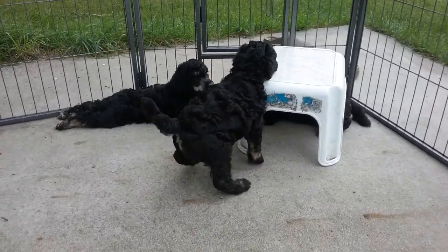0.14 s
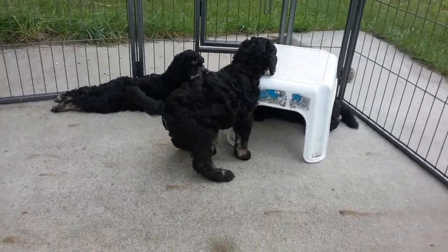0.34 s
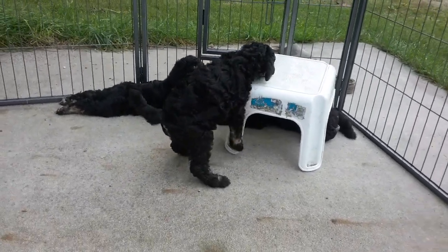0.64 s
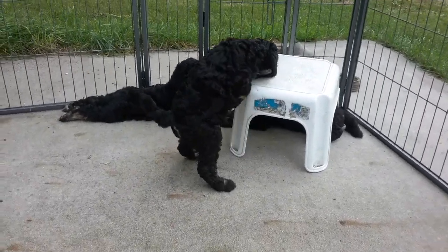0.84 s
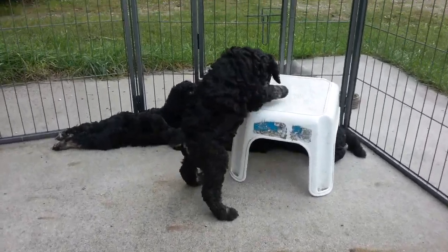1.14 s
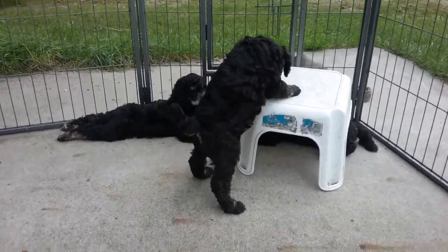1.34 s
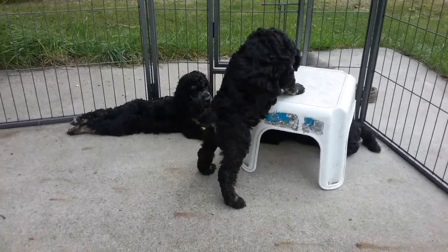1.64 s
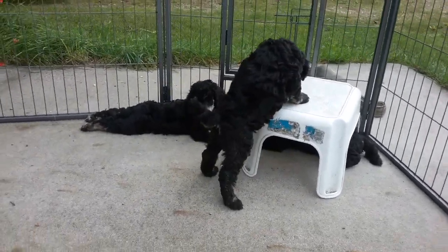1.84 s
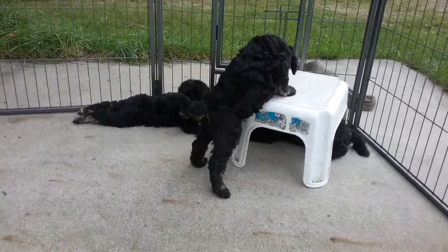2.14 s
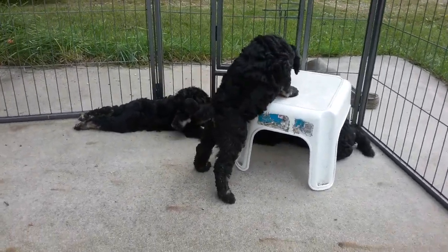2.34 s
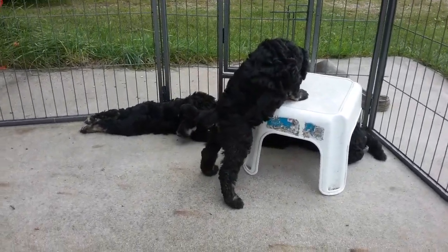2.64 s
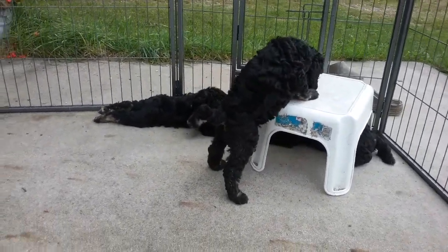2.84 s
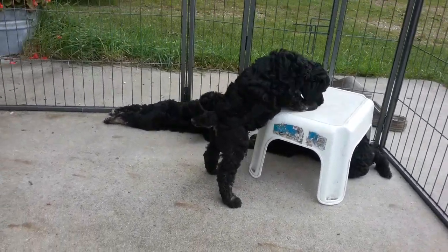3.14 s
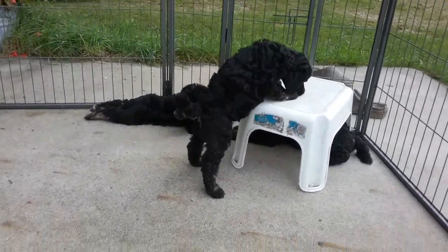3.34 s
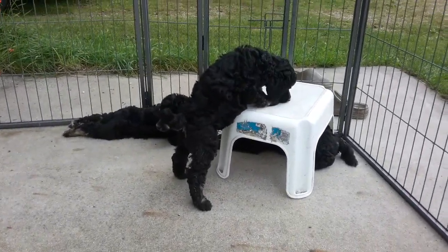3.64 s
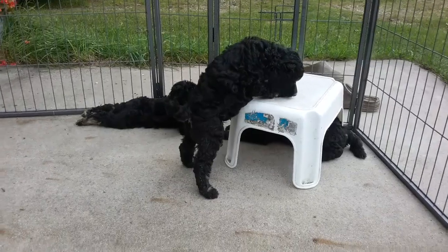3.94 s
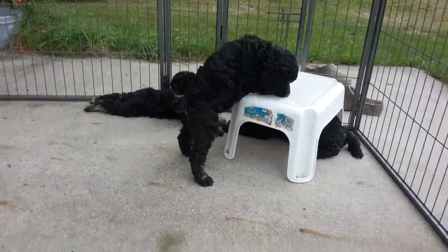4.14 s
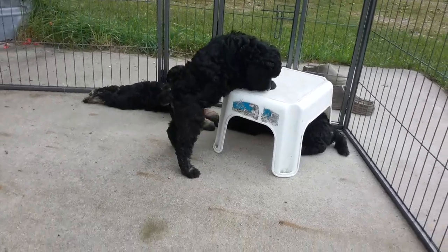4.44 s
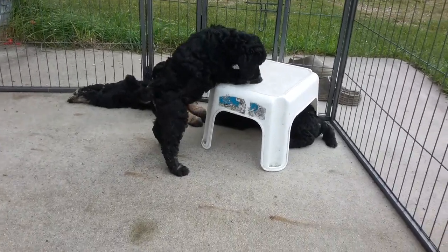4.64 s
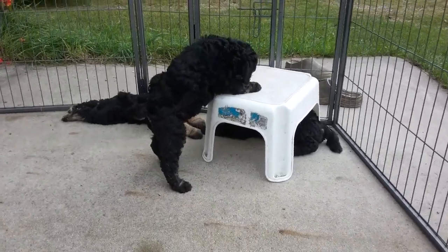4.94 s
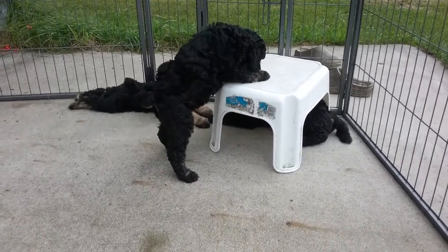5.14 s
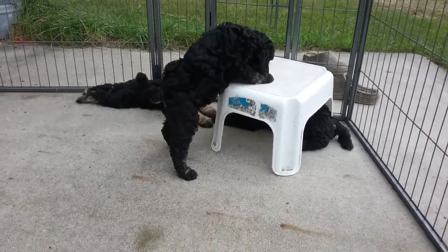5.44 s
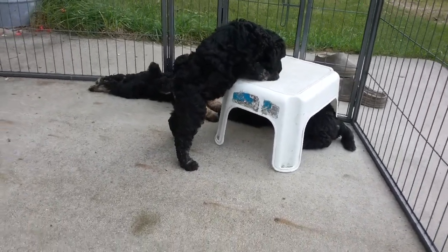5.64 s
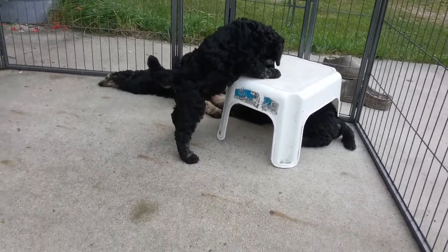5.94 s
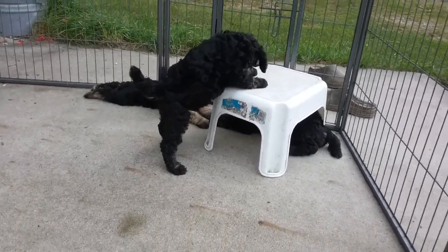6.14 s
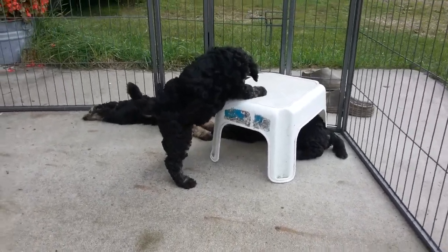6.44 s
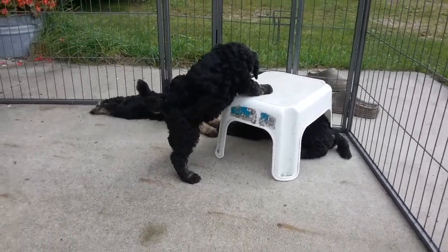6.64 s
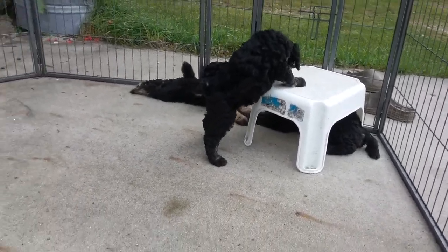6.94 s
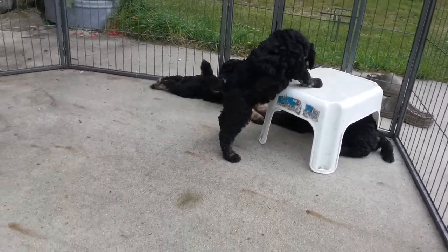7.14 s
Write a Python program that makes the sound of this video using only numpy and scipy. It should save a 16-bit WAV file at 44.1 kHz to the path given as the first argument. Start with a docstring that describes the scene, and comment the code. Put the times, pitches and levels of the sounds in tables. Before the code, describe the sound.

Close outdoor sound of soft paw pads knocking a light, hollow plastic step stool, making dull drumlike thuds with slight leg rocking and brief rim clacks. Dry claw scratches and fur rubbing fill the gaps. One bright bird call sounds early; faint high peeps recur far away. Activity comes in uneven bursts, strongest early, around three seconds and mid-five, over very quiet air with a short faint echo.

```python
"""A puppy paws at a hollow plastic step stool on a patio: pads thump the seat, a bank of decaying modes.
Claws tick and scratch as runs of tiny slips that shake the shell; pads and fur rub as filtered friction noise.
A house wall returns a short echo of blows and claws, made by convolution with decaying noise.
A bird calls once, a gliding sine; faint peeps and two faint high notes are narrow bands of noise.
Filtered noise gives the quiet air of the garden."""
import sys
import numpy as np
from scipy import signal
from scipy.fft import rfft, irfft
from scipy.io import wavfile

SR = 44100
rng = np.random.default_rng(int(sys.argv[2]) if len(sys.argv) > 2 else 0)


def bounce(signal):
    """Save signal as a 16-bit WAV file at the path given by the first command-line argument."""
    frames = np.transpose(np.atleast_2d(signal))
    limited = np.clip(frames, -1, 1)
    pcm = np.round(limited * 32767).astype(np.int16)
    wavfile.write(sys.argv[1], SR, pcm)


N = 321048
TIME = np.arange(N) / SR  # s
RING = np.arange(SR // 2) / SR  # s after the start of one event
BLOW = SR // 25  # samples over which the level of an event counts


def amp(db):
    """Logarithmic level: decibels become an amplitude gain."""
    return 10 ** (np.asarray(db) / 20)


def level(x, db, count=None):
    """Root mean square: scale x so that its first count samples have this level."""
    return x * amp(db) / np.sqrt(np.mean(x[:count] ** 2) + 1e-20)


def add(track, s, x):
    """Superposition: mix x into the track at s seconds."""
    start = max(int(s * SR), 0)
    x = x[:max(N - start, 0)]
    track[start:start + len(x)] += x


def colour(x, points, size=4096):
    """Minimum-phase filtering through (frequency [Hz], gain [dB]) points, so no sound precedes its cause."""
    hz, db = np.transpose(points)
    bin_hz = np.arange(size // 2 + 1) * SR / size
    gain_db = np.interp(np.log(bin_hz + 1), np.log(hz), db)
    # folding the cepstrum onto positive times makes the filter causal
    cepstrum = irfft(np.log(amp(gain_db)))
    cepstrum[1:size // 2] *= 2
    cepstrum[size // 2 + 1:] = 0
    impulse = irfft(np.exp(rfft(cepstrum)))
    return signal.fftconvolve(x, impulse)[:len(x)]


def fade(t60):
    """Exponential decay: the amplitude loses 60 dB in t60 seconds."""
    return np.exp(-np.log(1000) * RING / t60)


def walk(rate):
    """Random modulation: straight lines join random values drawn rate times a second, spread near 1."""
    return np.interp(TIME * rate, np.arange(N // 100), rng.standard_normal(N // 100))


def flips(count):
    """Modal polarity: a mode swings up or down depending on where it is struck."""
    return rng.choice([-1, 1], count)


def ring(modes, damping, scatter_db, weight=1):
    """Modal synthesis: decaying sines; each new spot loads and detunes them a little differently."""
    hz, db, t60 = np.transpose(modes)
    size, detune = rng.standard_normal((2, len(hz)))
    spot_hz = hz * (1 + 0.015 * detune)
    decays = fade((t60 * damping)[:, None])
    waves = np.sin(2 * np.pi * spot_hz[:, None] * RING) * decays
    return (weight * amp(db + scatter_db * size)) @ waves


def spot(x, depth_db, count=64):
    """Local resonance: each spot of the ribbed plastic favours its own set of overtones."""
    hz = np.geomspace(500, 9000, count)
    return colour(x, np.transpose([hz, depth_db * rng.standard_normal(count)]))


# spectrum of the garden air: (frequency [Hz], relative gain [dB])
GARDEN_SPECTRUM = [(30, -2), (120, 3.5), (280, -22.5), (500, -11.5), (2000, -15.5), (4000, -19),
                   (5200, -22), (7200, -12.5), (8800, -26), (15500, -22)]
GARDEN_DB = -70


def garden():
    """Broadband background: filtered noise gives quiet outdoor air with a nearly steady fine hiss."""
    air = colour(rng.standard_normal(N), GARDEN_SPECTRUM)
    return level(air, GARDEN_DB) * amp(0.16 * walk(5.9))


# slides of a paw or the chest over the seat, levels before the trims in rubbing():
# (time of full pressure [s], hold [s], pad rub level [dB], fur and claw hiss level [dB])
SEAT_SLIDES = [(0.417, 0.046, -60, -75), (0.543, 0.2, -52, -59), (0.764, 0.096, -54.5, -60),
               (0.91, 0.077, -58, -76), (1.032, 0.31, -54.5, -65), (1.414, 0.048, -50, -64.5),
               (1.762, 0.043, -62.5, -95), (1.975, 0.15, -66.5, -63.5), (2.89, 0.039, -59, -61),
               (3.01, 0.38, -65.5, -69), (3.45, 0.23, -66.5, -74), (3.802, 0.049, -57, -70),
               (4, 0.11, -48, -65.5), (4.173, 0.12, -53, -67), (4.365, 0.032, -51.5, -52.5),
               (4.453, 0.093, -51, -59.5), (4.579, 0.042, -46.5, -58), (4.671, 0.03, -55.5, -67),
               (4.756, 0.076, -61.5, -71), (4.963, 0.076, -51.5, -75), (5.114, 0.009, -49, -67.5),
               (5.244, 0.018, -66, -63), (5.515, 0.17, -53, -60), (5.739, 0.15, -49.5, -67.5),
               (5.93, 0.12, -59, -60.5), (6.135, 0.095, -59, -67.5), (6.328, 0.058, -59, -71),
               (6.527, 0.31, -63.5, -74), (7.133, 0.018, -56.5, -61.5), (7.2, 0.08, -57.5, -66.5)]
SLIDE_ATTACK_S, SLIDE_RELEASE_S = 0.038, 0.037  # time constants of build-up and dying away
REST_RUB_DB, REST_HISS_DB = -79, -76  # the puppy shifting its weight between slides


def sliding():
    """Energy summation: slides swell, hold and die away over a faint rustle; gives rub and hiss levels in dB."""
    rub, hiss = amp(REST_RUB_DB) ** 2, amp(REST_HISS_DB) ** 2
    for s, hold, rub_db, hiss_db in SEAT_SLIDES:
        before = np.clip(s - TIME, 0, 1)
        after = np.clip(TIME - s - hold, 0, 1)
        push = np.exp(-before / SLIDE_ATTACK_S - after / SLIDE_RELEASE_S)
        rub = rub + (push * amp(rub_db)) ** 2
        hiss = hiss + (push * amp(hiss_db)) ** 2
    return 10 * np.log10(rub), 10 * np.log10(hiss)


def friction(grain_db, flutter_db, size=64, count=4):
    """Stick-slip: short slips of uneven strength; the colour shifts as the paw slides from spot to spot."""
    strength = rng.exponential(size=N // size + 1).clip(0, 5)
    grains_db = grain_db * np.repeat(strength, size)[:N]
    slips = rng.standard_normal((count, N)) * amp(grains_db)
    return sum(spot(run, depth_db=4.0) * amp(flutter_db * walk(35)) for run in slips)


# modes of the ribs and rim: (frequency [Hz], relative level [dB], t60 before damping [s])
RIM_MODES = [(687.4, -1, 0.17), (748, -13, 0.19), (804.3, 2.5, 0.1), (888, 4.5, 0.06), (957, 4, 0.048),
             (1063, -9, 0.12), (1142, 2.5, 0.085), (1262, -11, 0.17), (1444, -2, 0.097), (1866, -30, 0.065),
             (2030, -9.5, 0.03)]
# spectrum of the pads' rub: (frequency [Hz], relative gain [dB])
RUB_SPECTRUM = [(60, -14), (200, 8.5), (290, 13), (400, 4), (900, 2.5), (1300, -4), (2000, -17),
                (6000, -51.5)]
# spectrum of the fur and claw hiss: (frequency [Hz], relative gain [dB])
HISS_SPECTRUM = [(1200, -1), (2400, 5), (3300, 1), (4800, -1), (6400, 5.5), (7200, -1.5), (9000, -20.5)]


def rubbing():
    """Friction excitation: sliding pads and chest sound the shell; fur and claw tips hiss over its texture."""
    rub_db, hiss_db = sliding()
    drag = friction(grain_db=2.0, flutter_db=4.5)
    shell = ring(RIM_MODES, 0.67, scatter_db=16, weight=flips(len(RIM_MODES)))
    shell_rub = signal.fftconvolve(drag, shell)[:N]
    rub = level(colour(drag, RUB_SPECTRUM), 0.7) + level(shell_rub, -17.0)
    # firmer pressure drags the pad over the grain of the plastic and brightens the rub
    grain = friction(grain_db=3.0, flutter_db=-0.5)
    rasp = level(colour(grain, [(600, -21.5), (1200, -1), (2300, -9.5), (8000, -45.5)]), -7.5)
    pressure_db = 0.98 * (rub_db - np.max(rub_db))
    hiss = level(colour(friction(grain_db=1.5, flutter_db=5.0), HISS_SPECTRUM), 0)
    return (rub + rasp * amp(pressure_db)) * amp(rub_db) + hiss * amp(hiss_db)


# faint far peeps near 5 kHz, and two faint high notes near 8 kHz: (time [s], centre pitch [Hz])
FAINT_NOTES = [(.02, 4730), (0.179, 5040), (1.95, 8100), (2.47, 5230), (3.312, 5130), (4.4, 7950),
               (4.77, 5200), (5.68, 5130), (6.26, 5160), (6.521, 5180)]


def faint_notes():
    """Band-pass filtering: noise in a narrow band flutters like a blurred note as it swells and dies."""
    out = np.zeros(N)
    for s, hz in FAINT_NOTES:
        band = signal.butter(2, [hz - 110, hz + 110], "band", fs=SR, output="sos")
        note = signal.sosfilt(band, rng.standard_normal(len(RING))) * RING ** 2 * fade(0.23)
        add(out, s, level(note, -84.0))
    return out


# claw tips tick with every blow; TICK_DB is re the shell clack, and claws() trims level and treble
TICK_LEAD_S, TICK_DB, TICK_BRIGHT_DB, TICK_S = 0.001, -14.5, -3, 0.0043


def ticks():
    """Contact order: claws touch just before the pad; the louder the shell clack, the louder they tick."""
    return [(s - TICK_LEAD_S, db + clack_db + TICK_DB, TICK_BRIGHT_DB, TICK_S)
            for s, db, _, _, clack_db in PAD_BLOWS]


# claw scratches; claws() adds 3 dB to the level and 5 dB to the treble balance:
# (time [s], level [dB], top treble over low treble [dB], length [s])
CLAW_SCRATCHES = [(0.158, -51.5, 3, 0.0035), (0.55, -51, -9, 0.0055), (0.627, -59, -27, 0.007),
                  (0.747, -48.5, 5, 0.042), (1.031, -63, 13, 0.031), (1.175, -61.5, -4, 0.0076),
                  (1.304, -58.5, -6, 0.019), (1.909, -77.5, -26, 0.0034), (1.969, -64, 2, 0.029),
                  (2.693, -55, 4.5, 0.002), (2.864, -56.5, -34, 0.002), (3.07, -53.5, -3, 0.027),
                  (3.117, -51, -1.5, 0.0042), (3.194, -60.5, 5.5, 0.036), (3.51, -62, -10, 0.013),
                  (3.748, -60.5, -2, 0.0037), (3.986, -59.5, 0, 0.033), (4.035, -55.5, -27, 0.0085),
                  (4.144, -65, 6, 0.017), (5.02, -62, -0.5, 0.021), (5.215, -57.5, -5, 0.029),
                  (5.381, -47.5, 0.5, 0.0068), (5.492, -54, -1.5, 0.014), (5.608, -45.5, -4, 0.014),
                  (5.975, -57.5, 3, 0.023), (6.133, -74, 4, 0.005), (6.314, -66, 1, 0.004),
                  (6.576, -63, -12, 0.0087), (7.064, -58, 1, 0.0069), (7.139, -61.5, -6, 0.021)]
# spectrum of claw on plastic: (frequency [Hz], relative gain [dB])
CLAW_SPECTRUM = [(600, 7.5), (1200, 4.5), (2300, 4.5), (2800, 3.5), (3300, 0), (4200, -4), (5300, -7.5),
                 (6400, -1.5), (7000, -15.5), (8300, -28.5), (10000, -34), (15500, -30)]


def claws():
    """Stick-slip impulses: a claw lands and skids in tiny slips, each shaking the stiff plastic briefly."""
    out = np.zeros(N)
    shake = (fade(0.017) + amp(-9) * fade(0.13)) ** 2
    for s, db, bright_db, length in CLAW_SCRATCHES + ticks():
        strength = amp(1.4 * rng.exponential(size=len(RING)).clip(0, 4))
        slips = strength * (rng.random(len(RING)) < .015)
        energy = slips ** 2 * np.exp(-2 * (RING / length) ** 2)
        # a short stroke is mostly its landing, a long one mostly skid
        energy[0] += np.sum(energy) * 0.0022 / length + 1
        envelope = np.sqrt(np.abs(signal.fftconvolve(energy, shake)[:len(RING)]))
        shaking = envelope * rng.standard_normal(len(RING))
        # each slip also snaps dryly, straight from the claw tip
        snaps = amp(7) * np.sqrt(energy) * flips(len(RING))
        tick = spot(colour(shaking + snaps, CLAW_SPECTRUM), depth_db=5.0)
        tick = colour(tick, [(2800, 0.015), (6000, bright_db + 5)])
        add(out, s, level(tick, db + 3, BLOW))
    return out


# pad blows: (time [s], seat level [dB], pitch of the struck spot [Hz],
# leg boom re seat level [dB], shell clack re seat level [dB])
PAD_BLOWS = [(0.05, -58.5, 305, -5, -1.5), (0.17, -38, 371, -7.5, -17.5), (0.204, -47, 259, -5, -14.5),
             (0.345, -50, 252, -8, -22), (0.361, -42, 207, -7.5, -16), (0.495, -37.5, 248, -9, -12.5),
             (0.514, -38.5, 386, -9, -8), (0.551, -43.5, 250, -11, -10.5), (0.626, -46.5, 235, -10, -4.5),
             (0.631, -24.5, 201, -17, -30), (0.697, -38.5, 260, -15, -26), (0.791, -40.5, 250, -5.5, -18),
             (1.165, -48, 275, -1.5, -23), (1.229, -36, 259, -7, -25.5), (1.276, -27.5, 178, -8.5, -28),
             (1.318, -45.5, 188, -11, -11), (1.583, -43.5, 252, -4, -19), (1.878, -55, 195, -2, -19),
             (1.931, -40.5, 274, -5.5, -18), (1.949, -36.5, 220, -14, -22.5), (1.995, -47, 192, -7, -21),
             (2.693, -36.5, 320, -5.5, -19), (2.705, -31, 241.5, -25, -48), (2.78, -38.5, 236, -11, -18),
             (2.864, -34.5, 287, -15, -6.5), (2.934, -34, 209, -3.5, -22.5), (3.075, -45, 251, -13, -10.5),
             (3.124, -42, 214, -5.5, -7.5), (3.269, -60.5, 328, 1, 7.5), (3.302, -35, 253, -15.5, -5),
             (3.461, -40.5, 275, -6, -18.5), (3.518, -44.5, 249, -9, -17), (3.629, -50.5, 301, -1, -28),
             (3.745, -34.5, 218, -3, -15), (3.777, -42, 216, -24, -21), (4.072, -41.5, 278, -2.5, -18),
             (4.218, -47.5, 275, -3.5, -13), (4.245, -27, 207, -13, -32.5), (5.217, -48, 275, -30, -0.5),
             (5.312, -36, 448, -9, -9), (5.325, -32.5, 217, -21, -23.5), (5.383, -28.5, 323, -9.5, -12.5),
             (5.48, -37.5, 285, -21, -14.5), (5.496, -35.5, 233, -8.5, -34), (5.612, -36.5, 251, 4.5, -9),
             (5.641, -36, 228, 2.5, -13), (5.968, -53.5, 443, -12, 3.5), (6.002, -45, 225, 0, -9.5),
             (6.129, -41, 222, -2, -16.5), (6.312, -41.5, 201, 1.5, -20), (6.486, -53.5, 232, -7.5, -20),
             (6.762, -54.5, 292, -5.5, -9.5), (7.014, -40.5, 209, -36, -45), (7.066, -49.5, 213, -1.5, -11),
             (7.233, -48, 240, -8, -25)]
# share of the ring time that a blow leaves: the softer the pad lands, the longer it stays and damps the seat
FREE_RING, RING_PER_CLACK_DB = 1.067, 0.0065
# a blow that follows within this time finds the paw still down, and keeps only this share of its ring
PAW_DOWN_S, CHOKED_SHARE = 0.07, 0.88


def blows():
    """Contact damping: soft pads, and a paw already down, leave each blow a smaller share of its ring time."""
    gaps = np.diff([row[0] for row in PAD_BLOWS], prepend=-1)
    choke = np.where(gaps < PAW_DOWN_S, CHOKED_SHARE, 1)
    return [(*row, (FREE_RING + RING_PER_CLACK_DB * row[-1]) * share)
            for row, share in zip(PAD_BLOWS, choke)]


def rattle(t60, points):
    """High modal density: a dying noise burst stands for many close resonances, at unit level."""
    return level(colour(rng.standard_normal(len(RING)) * fade(t60), points), 0, BLOW)


def swell(seconds):
    """Contact compliance: a pad flattens as it lands, so its push builds up with this time constant."""
    return 1 - np.exp(-RING / seconds)


# the stool rocking on its legs: (frequency [Hz], relative level [dB], t60 before damping [s])
ROCKING_MODES = [(83.3, -15, 0.35), (103.3, 1, 0.14), (120.5, -5, 0.29)]
# seat and side panels flexing: (frequency [Hz], relative level [dB], t60 before damping [s])
PANEL_MODES = [(147, 3.5, 0.14), (170.7, -5.5, 0.23), (189.5, 0, 0.19), (211.2, -3.5, 0.12),
               (240.3, -6.5, 0.17), (271.6, 1, 0.14), (323, -1, 0.14), (344.3, 3.5, 0.1), (379, -9.5, 0.21),
               (436, 7.5, 0.056), (544.5, 3, 0.082), (601, -11.5, 0.16)]


def paws():
    """Modal excitation: a pad dents the seat, which rings near that spot's pitch; legs rock, the rim claps."""
    out = np.zeros(N)
    seat_hz = np.transpose(PANEL_MODES)[0]
    for s, db, spot_hz, boom_db, clack_db, damping in blows():
        near_spot = 1 / (1 + (np.log2(seat_hz / spot_hz) / .5) ** 2)
        seat = ring(PANEL_MODES, damping, scatter_db=5.5, weight=near_spot)
        seat = level(seat * swell(0.012), 0, BLOW)
        # a paw that stays down chokes the ring and leaves a dead thud of two or three swings
        swings = RING * spot_hz
        thud = np.sin(2 * np.pi * swings) * swings ** 2 * np.exp(-(swings / 1.18) ** 2)
        thud = level(thud, 0, BLOW)
        thud_db = np.clip(28 * (.76 - damping), -20, 4)
        # the loose stool judders on the concrete, which blurs its modes
        judder = rattle(.2 * damping, [(70, -30), (spot_hz / 2.07, -3), (spot_hz, 0),
                                       (spot_hz * 2, -12), (1500, -40), (12000, -100)])
        body = seat + amp(thud_db) * thud + amp(-6.5) * judder * swell(0.0014)

        stamp = rattle(.22 * damping, [(45, -43.0), (85, -2.0), (135, 0.5), (300, -24.0), (5000, -110)])
        rocking = level(ring(ROCKING_MODES, damping, scatter_db=1.0), 0, BLOW)
        legs = (rocking + amp(-2.5) * stamp) * swell(0.01)

        # the softer the blow, the more slowly the rim takes it up
        contact = 0.00043 + 0.005 * np.clip(-clack_db / 30, 0, 1)
        shell = ring(RIM_MODES, damping, scatter_db=6, weight=flips(len(RIM_MODES)))
        shell = level(shell, 0, BLOW)
        slap = rattle(.08 * damping, [(350, -12), (700, 4.0), (1200, -4.0), (2000, -13),
                                      (4000, -44.0), (10000, -54.5)])
        clack = (shell + amp(-0.5) * spot(slap, depth_db=4.0)) * swell(contact)

        blow = level(body, db, BLOW)
        blow = blow + level(legs, db + boom_db, BLOW) + level(clack, db + clack_db, BLOW)
        add(out, s, blow)
    return out


def patio(x, wet_db, t60, delay):
    """Reverberation by convolution: a short echo from the house wall and the pen follows after a delay."""
    noise = rng.standard_normal(len(RING)) * fade(t60) * (RING > delay)
    tail = colour(noise, [(100, 6.5), (350, -7.5), (1000, -4.5), (6500, 6.5), (12000, -1.0)])
    tail = tail / np.sqrt(np.sum(tail ** 2))
    return x + amp(wet_db) * signal.fftconvolve(x, tail)[:N]


def chirp(start_hz, end_hz, length, scatter_db, t60):
    """Frequency glide: a whistle slides towards its end pitch, smeared by scattering from the trees."""
    hz = end_hz + (start_hz - end_hz) * np.exp(-3 * RING / length)
    envelope = np.sin(np.pi * np.minimum(RING / length, 1)) ** 2
    note = np.sin(2 * np.pi * np.cumsum(hz) / SR) * envelope
    scatter = rng.standard_normal(len(RING)) * fade(t60)
    trees = signal.fftconvolve(note, scatter)[:len(RING)]
    return level(note, 0) + level(trees, scatter_db)


def bird_call():
    """Frequency modulation: one sharp rising call nearby."""
    out = np.zeros(N)
    call = chirp(start_hz=5100, end_hz=6960, length=0.029, scatter_db=2, t60=0.4)
    add(out, .338, level(call, -58.5, BLOW))
    return out


def scene():
    """Superposition: blows and claws in their echo, with rubbing, bird call, faint notes and garden added."""
    stool = patio(paws() + claws(), wet_db=-18.0, t60=0.61, delay=0.02)
    return (stool + rubbing() + bird_call() + faint_notes() + garden())[None]


TOP_HZ = 15800


def record(dry):
    """Band limiting: the microphone loses the deep bass and the very top."""
    bass_cut = signal.butter(4, 54, "high", fs=SR, output="sos")
    top_cut = signal.ellip(10, .2, 70, TOP_HZ, fs=SR, output="sos")
    return signal.sosfilt(top_cut, signal.sosfilt(bass_cut, dry))


dry = scene()
out = record(dry)
bounce(out)
```